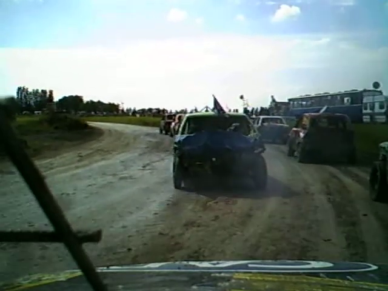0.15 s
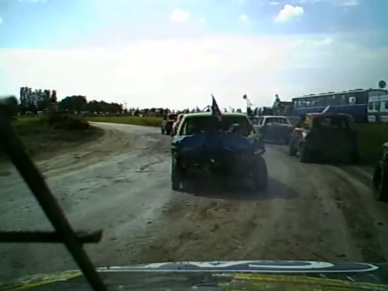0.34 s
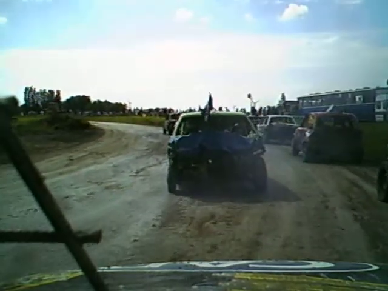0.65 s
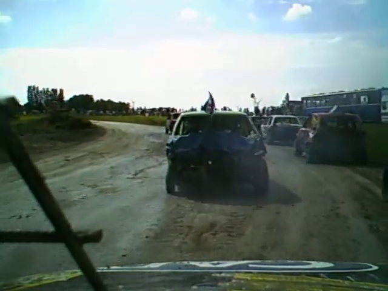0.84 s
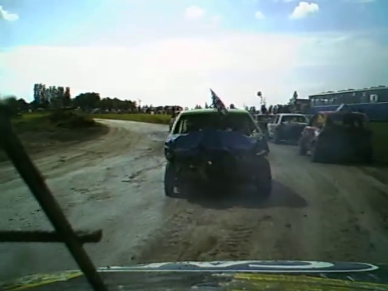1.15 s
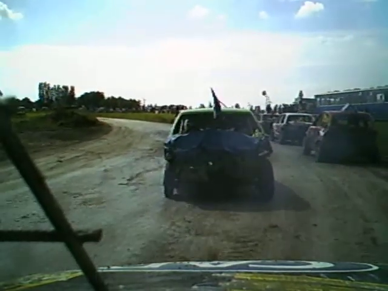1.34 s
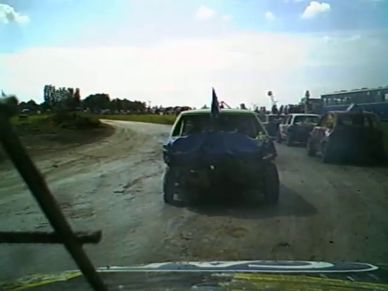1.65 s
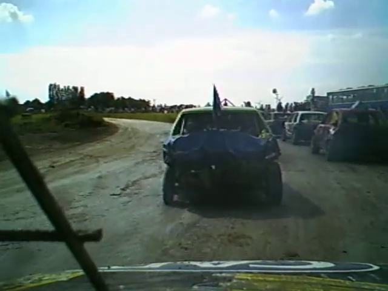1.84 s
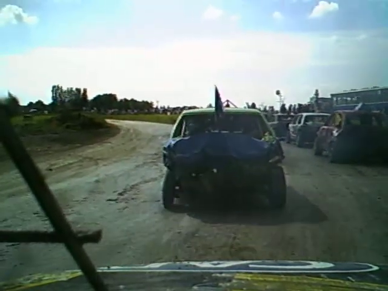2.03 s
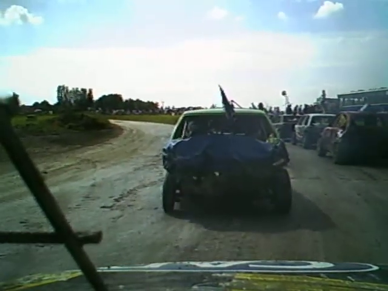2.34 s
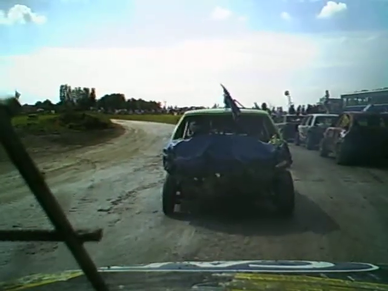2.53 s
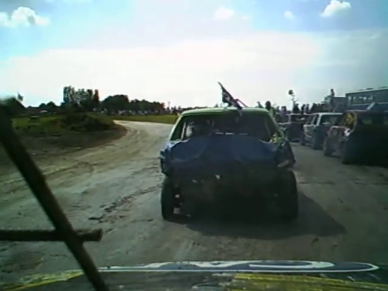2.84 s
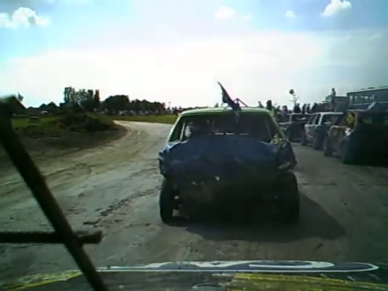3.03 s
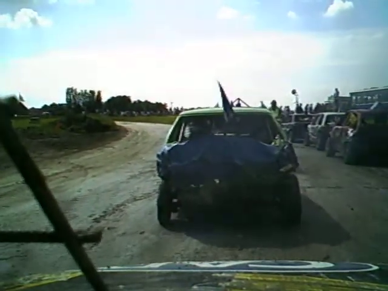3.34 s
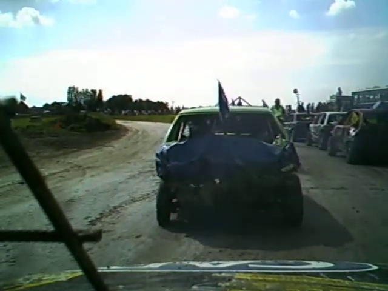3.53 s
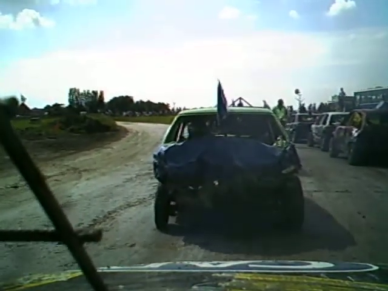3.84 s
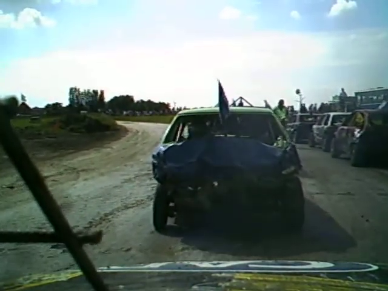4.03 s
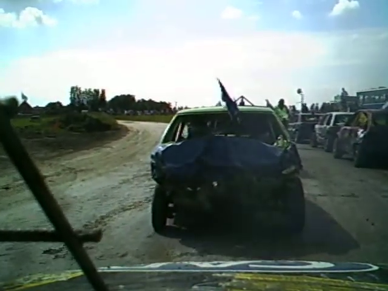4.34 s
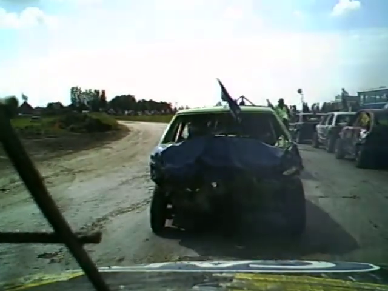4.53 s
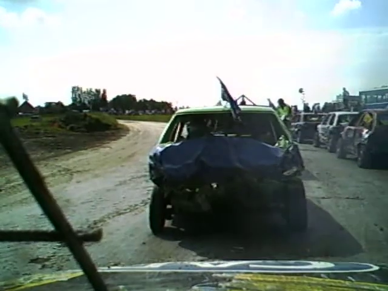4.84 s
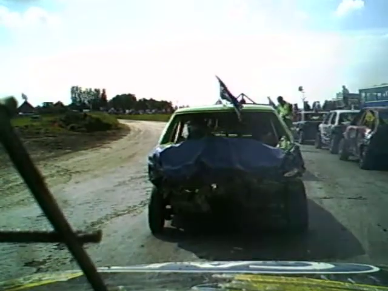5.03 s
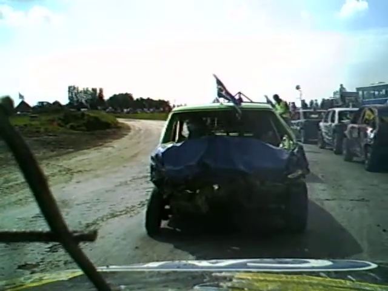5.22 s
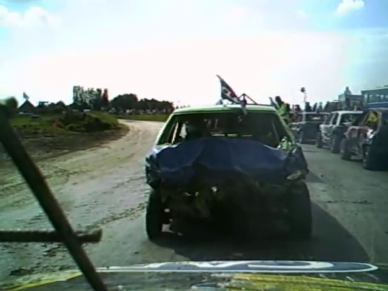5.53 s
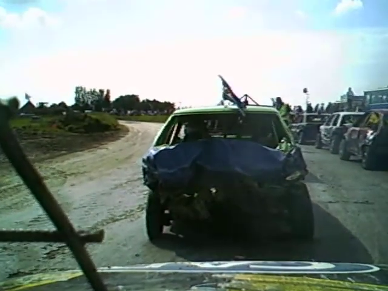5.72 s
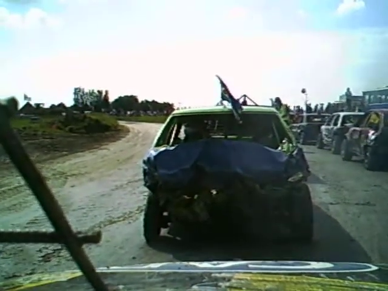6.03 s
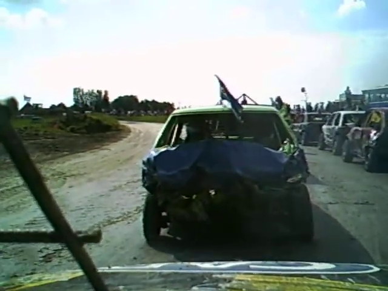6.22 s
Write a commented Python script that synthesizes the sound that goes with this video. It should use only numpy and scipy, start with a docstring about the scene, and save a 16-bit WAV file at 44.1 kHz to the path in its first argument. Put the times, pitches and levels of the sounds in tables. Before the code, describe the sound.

Inside a bare race car rolling slowly on a dirt track, an open exhaust lopes unevenly beneath a steady mechanical whir and midrange clatter. Dry ticks come irregularly, the floor booms, and another car revs faintly further off around two seconds. Late on, the throttle is blipped in two short bouts, raspy and clipped. The small camera microphone sounds narrow, boxy and ringing.

```python
"""Rolling race car with throttle blips

Inside a stripped race car the drivetrain whirs and clatters, as sums of shaft orders and shaped noise. An open
exhaust lopes at idle on uneven firing orders, then is blipped in two short bouts of pressure waves, cracks and
gas noise. The floor pan booms and another car revs further off; short dry ticks sound now and then. A small
camera with a ringing case hears it in a narrow band and overloads on the loud revs."""
import sys
import numpy as np
from scipy import signal
from scipy.fft import rfft, irfft
from scipy.io import wavfile

SR = 44100
rng = np.random.default_rng(int(sys.argv[2]) if len(sys.argv) > 2 else 0)


def to_wav(s):
    """Save 16-bit WAV."""
    ch = np.atleast_2d(s).T  # columns
    pcm = np.round(np.clip(ch, -1, 1) * 32767)  # PCM
    wavfile.write(sys.argv[1], SR, pcm.astype(np.int16))


N = 281358
TIME = np.arange(N) / SR

# throttle blips, full or part: start t/s, length t/s, pressure wave level/dB, rasp level/dB
THROTTLE_BLIPS = [(4.652, 0.12, -14, -20), (4.736, 0.17, 5, -6.5), (4.949, 0.19, -9, -25),
                  (5.038, 0.37, 8.5, -3), (5.851, 0.11, 5.5, -5.5), (5.995, 0.04024, 2.5, -14.5),
                  (6.039, 0.14, -7.5, -23.5), (6.199, 0.22, 3, -3.5)]

CASE_HZ, CASE_WIDTH_HZ = 1351, 211  # resonance of the camera case


def gain_of(db):
    """Level definition: decibels become an amplitude factor."""
    return 10 ** (np.asarray(db) / 20)


def evened(x):
    """Normalization: scales a signal to an rms of 1."""
    return x / np.sqrt(np.mean(x ** 2) + 1e-20)


def curves(rows):
    """Linear interpolation: joins each column of a table by straight lines in time."""
    times, *columns = np.transpose(rows)
    return [np.interp(TIME, times, column) for column in columns]


def noise(points):
    """Spectral shaping: white noise takes the relative spectrum given, at an rms of 1."""
    hz, db = np.transpose(points)
    bins_hz = np.fft.rfftfreq(N, 1 / SR)
    shape = gain_of(np.interp(np.log(bins_hz + 1), np.log(hz), db))
    return evened(irfft(rfft(rng.standard_normal(N)) * shape, N))


def wander(rate_hz):
    """Band-limited random modulation: a smooth drift of rms 1."""
    knots = rng.standard_normal(4096)
    fine = 8 * len(knots)
    smooth = signal.resample(knots, fine)
    return evened(np.interp(TIME * rate_hz * 8, np.arange(fine), smooth))


def resonate(x, hz, width_hz):
    """Damped resonance: a single mode with a peak gain of 1."""
    return signal.lfilter(*signal.iirpeak(hz, hz / width_hz, fs=SR), x)


def gate(turns, place, sharpness):
    """Cyclic modulation: a smooth bump once a cycle."""
    return np.exp(sharpness * (np.cos(2 * np.pi * (turns - place)) - 1))


def low_pass(x, hz, size):
    """Band limiting: a steep linear-phase filter."""
    taps = signal.firwin(size, hz, window=("kaiser", 8), fs=SR)
    return signal.oaconvolve(x, taps, "same")


def held_back(x, ceiling):
    """Soft saturation: the envelope of the largest swings approaches a ceiling."""
    envelope = abs(signal.hilbert(x))
    return x / (1 + (envelope / ceiling) ** 4) ** (1 / 4)


def rival(rough=0.21):
    """Harmonic synthesis: a few middle firing orders stand for a distant exhaust."""
    # the other car's revs: t/s, firing rate f/Hz, level/dB
    far_revs = [(1.5, 48, -47.5), (1.8, 50, -30), (2.15, 43, -37.5), (2.4, 39.5, -19.5), (2.55, 41, -29.5),
                (2.85, 36, -62)]
    firing_hz, level_db = curves(far_revs)
    turns = np.cumsum(firing_hz) / SR
    orders = 0
    for k in range(3, 7):
        flutter = 1 + rough * wander(12)
        orders = orders + flutter * np.sin(2 * np.pi * (k * turns + rng.random())) / k
    return gain_of(level_db) * evened(orders)


def ticks(level_db=12):
    """Impulse response: each dry tick is a short impulse through one heavily damped mode."""
    # dry ticks: t/s, peak level before level_db is added/dB
    tick_list = [(0.7198, -28.5), (1.1022, -24), (1.6451, -38), (1.8172, -50), (1.8432, -38),
                 (2.381, -33.5), (2.5356, -38), (3.6899, -36), (4.2723, -39), (4.563, -36.5), (4.995, -34),
                 (5.585, -34)]
    impulses = np.zeros(N)
    for time, db in tick_list:
        impulses[round(time * SR)] = gain_of(db)
    tick = resonate(impulses, hz=2600, width_hz=1300)
    return gain_of(level_db) * tick * impulses.max() / abs(tick).max()


def floor_pan(shaft):
    """Forced vibration: the floor pan booms at twice the shaft speed."""
    # boom of the pan: t/s, amplitude level/dB
    pan_boom = [(0, -23.5), (1.6, -28), (1.82, -11.5), (2.45, -18), (2.9, -16), (4, -31)]
    phase = 4 * np.pi * shaft + 0.29 * wander(2)
    return gain_of(curves(pan_boom)[0]) * np.sin(phase)


def drivetrain(turns, firings, flutter=.12, lope=0.072, fizz_db=-28):
    """Order synthesis: shaft-locked whir lines and fizz, over noise modulated by shaft and firings."""
    # whirring lines: multiple of the shaft speed, relative level/dB
    whir_lines = [(6, -14.5), (10, -13), (12, -27.5), (15, -15.5), (15.5, -20), (18, -28.5), (23, -23.5),
                  (33, -19.5), (34, -35), (35, -35.5), (36, -9), (37, -15.5), (40, -27), (41, -9.5),
                  (42, -17), (43, -30), (44, -19.5), (46, -25), (47, -17.5), (50, -25.5), (54, -27),
                  (55, -32.5)]
    # load on the drivetrain: t/s, whir level/dB, clatter level/dB
    load = [(0, -29, -23.5), (1.3, -26, -27), (3.4, -26.5, -27), (3.7, -32, -26.5), (4.3, -30, -28),
            (5.65, -35, -28.5)]
    # colour of the clatter: f/Hz, relative level per Hz/dB
    clatter_colour = [(200, -8.5), (290, -15), (350, -3.5), (440, -12), (600, -10.5), (950, -11.5),
                      (1120, -6.5), (1220, 0), (1290, -5), (1400, 3), (1560, -8.5), (1750, -17),
                      (2000, -26.5), (2600, -42.5), (4000, -34)]
    whir_db, clatter_db = curves(load)

    whir = 0
    for k, db in whir_lines:
        amplitude = gain_of(db) * (1 + flutter * wander(14))
        whir = whir + amplitude * np.cos(2 * np.pi * k * turns + .4 * wander(9))

    hiss = resonate(rng.standard_normal(N), hz=3250, width_hz=500)
    fizz = resonate(hiss, hz=3420, width_hz=440)
    fizz = fizz * gate(turns / 4, place=0.092, sharpness=.4)  # swells every fourth turn

    # the clatter swells with each shaft turn and every second firing
    throb = gate(turns, place=0, sharpness=.22)
    clatter = noise(clatter_colour) * throb * gate(firings / 2, 0, lope)

    tones = evened(whir) + gain_of(fizz_db) * evened(fizz)
    return gain_of(whir_db) * tones + gain_of(clatter_db) * evened(clatter)


def idle(turns, shell_db=-1, rough=0.34, lag=1.678, stiffness=0.42):
    """Dispersed harmonics: uneven firings boom in the cabin and the bare shell adds low noise."""
    # exhaust in the cabin, sinking briefly between the bouts: t/s, level before the swell/dB
    lope_level = [(0, -16), (1.5, -16), (1.85, -16), (3.6, -13), (4.2, -15), (4.6, -12.5), (5.6, -9),
                  (5.72, -19), (5.86, -8.5)]
    # uneven cylinders: multiple of the firing rate, relative level/dB
    cylinders = [(.5, 1.5), (1, 3.5), (1.5, -6), (2, 0), (2.5, -10), (3, -19.5), (3.5, -13.5), (4, -20.5),
                 (5, -19.5)]
    # shaking body shell: f/Hz, relative level per Hz/dB
    shell_colour = [(12, -26), (24, -7.5), (40, -2), (62, 4), (85, 0), (120, -2.5), (160, -20), (185, -13),
                    (240, -21.5), (290, -26.5), (600, -31.5), (1500, -72)]
    level_db = curves(lope_level)[0] + 1.25 * wander(5)  # the idle hunts

    boom = 0
    for k, db in cylinders:
        amplitude = gain_of(db) * (1 + rough * wander(14))
        # the pipe delays order k by lag * k**2 radians
        phase = 2 * np.pi * k * turns - lag * k * k + rough * wander(26)
        boom = boom + amplitude * np.sin(phase)

    rumble = evened(evened(boom) + gain_of(shell_db) * noise(shell_colour))
    return gain_of(level_db) * evened(held_back(rumble, 1 / stiffness))


def throttle(column, attack_s, edge_db, peak_at, release_s):
    """Envelope control: blips rise, strong ones arch from edge_db to a peak, and decay into an overrun."""
    overrun, overrun_s = gain_of(-6.5), 0.054  # the weaker, separate decay after each blip
    total = np.zeros(N)
    for (start, length, *_), db in zip(THROTTLE_BLIPS, column):
        held = np.clip(TIME - start, 0, length)
        shut = np.maximum(TIME - start - length, 0)
        # peak_at is a share of the blip's length
        off_peak = np.interp(held / length, [0, peak_at, 1], [1, 0, 1])
        arch = gain_of(db - max(db - edge_db, 0) * off_peak ** 2)
        release = (1 - overrun) * np.exp(-shut / release_s) + overrun * np.exp(-shut / overrun_s)
        blip = np.minimum(held / attack_s, 1) * arch * release
        total = np.maximum(total, blip)
    return total


def revs(turns, push, blast, shake, skew=0.12, uneven=0.22,
         crack_db=-11, hiss_db=-24, roar_db=-13, knock_db=-3):
    """Pulsed excitation: each firing is a pressure wave with a crack, and a rasp of gas near its trough."""
    wave = np.sin(2 * np.pi * turns) - skew * np.cos(4 * np.pi * turns)
    wave = wave * (1 + 0.26 * wander(60))

    strong_weak = 1 + uneven * np.cos(np.pi * turns)  # alternate firings differ
    gas = rng.standard_normal(N) * gate(turns, place=0.86, sharpness=0.77) * strong_weak
    # one sharp blow leads each puff of gas
    knocks = np.diff(np.floor(turns - .76), prepend=-1) * strong_weak

    def through_case(x):
        """Cascaded resonance: the camera case rings in two equal stages."""
        once = resonate(x, CASE_HZ, CASE_WIDTH_HZ)
        return evened(resonate(once, CASE_HZ, CASE_WIDTH_HZ))

    ring = evened(through_case(gas) + gain_of(knock_db) * through_case(knocks))
    hiss = evened(resonate(gas, hz=1510, width_hz=9000))

    valves = np.diff(np.floor(turns - .6), prepend=-1) * (1 + 0.73 * wander(60))
    crack = resonate(valves, hz=1430, width_hz=366)
    crack = evened(resonate(crack, hz=579, width_hz=86))

    # the body panels shake all through the cycle
    panels = resonate(rng.standard_normal(N), hz=440, width_hz=290)
    roar = evened(resonate(panels, hz=665, width_hz=430))

    pressure = push * (wave + gain_of(crack_db) * crack)
    rasp = blast * (ring + gain_of(hiss_db) * hiss)
    return pressure + rasp + shake * gain_of(roar_db) * roar


def scene():
    """Superposition: all sources add at the camera."""
    # drivetrain shaft, quickest near 3.7 s: t/s, turning rate before drift f/Hz
    shaft_speed = [(0, 33.5), (.85, 33.4), (1.1, 33.3), (2.2, 33.8), (2.6, 33), (3.52, 33.4), (3.7, 35),
                   (4.6, 32.6)]
    # engine speed, slack at idle and leaping in the bouts: t/s, firing rate before jitter f/Hz
    firing_rate = [(0, 58), (1.15, 55), (1.45, 51), (3.6, 50.5), (4.3, 44.1), (4.77, 52.5), (4.87, 69),
                   (4.95, 62.8), (5.04, 85.6), (5.16, 68.5), (5.26, 62), (5.4, 62.1), (5.87, 56),
                   (5.96, 64.6), (6.08, 79), (6.24, 76), (6.38, 77.3)]
    drift = 1 + 0.001454 * wander(3) + 0.00071 * wander(25)
    shaft = np.cumsum(curves(shaft_speed)[0] * drift) / SR
    jitter = 1 + 0.005026 * wander(40)
    turns = np.cumsum(curves(firing_rate)[0] * jitter) / SR

    _, _, wave_db, rasp_db = np.transpose(THROTTLE_BLIPS)
    push = throttle(wave_db, attack_s=0.024, edge_db=-5, peak_at=0.69, release_s=.02)
    blast = throttle(rasp_db, attack_s=0.017, edge_db=-10, peak_at=0.53, release_s=0.015)
    # the panels follow the rasp and are slow to settle
    shake = throttle(rasp_db, attack_s=0.011, edge_db=-7.5, peak_at=0.53, release_s=0.082)

    lope = idle(turns) / (1 + push)  # an open throttle quiets the lope
    bass = held_back(lope + floor_pan(shaft), gain_of(-5))  # the cabin limits the bass
    background = rival() + ticks() + drivetrain(shaft, turns)
    return (background + bass + revs(turns, push, blast, shake))[None]


def record(dry, rail=0.54, leak=0.0083, coupling_hz=60, droop_hz=3600):
    """Nonlinear transduction: preamp rails clip, the coupling capacitor sags, the converter clips again."""
    band_hz, edge_hz = 4080, 16000
    full_scale, knee = .725, 30
    # the rails give a little
    preamp = (1 - leak) * np.clip(dry[0], -rail, rail) + leak * dry[0]
    # the capacitor lets the flat tops sag
    sagged = signal.lfilter(*signal.butter(1, coupling_hz, "high", fs=SR), preamp)
    dulled = signal.lfilter(*signal.butter(4, droop_hz, fs=SR), sagged)
    narrow = low_pass(dulled, band_hz, size=201)
    clipped = narrow / (1 + abs(narrow / full_scale) ** knee) ** (1 / knee)
    body = low_pass(clipped, band_hz, size=301)
    crackle = clipped - body  # what the clipping throws above the band
    return low_pass(body + gain_of(-2) * crackle, edge_hz, size=511)[None]


dry = scene()
out = record(dry)
to_wav(out)
```